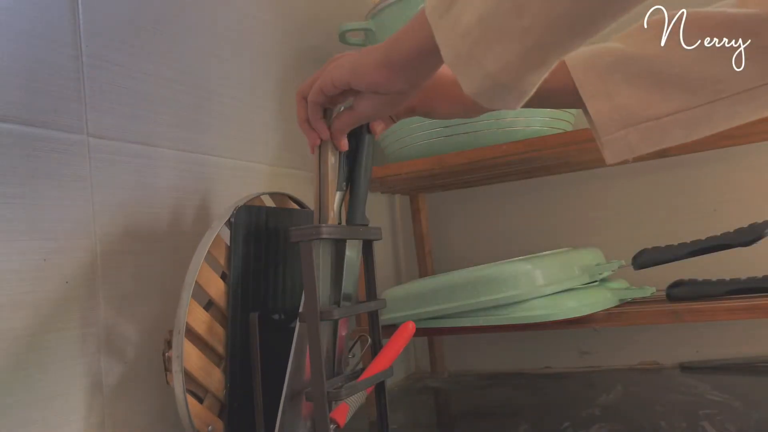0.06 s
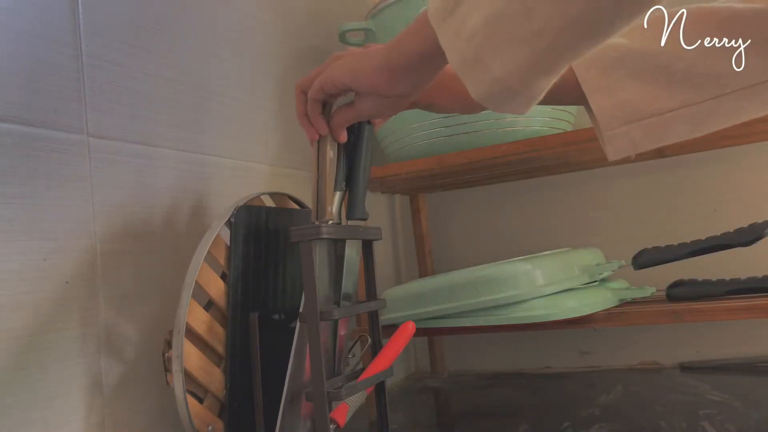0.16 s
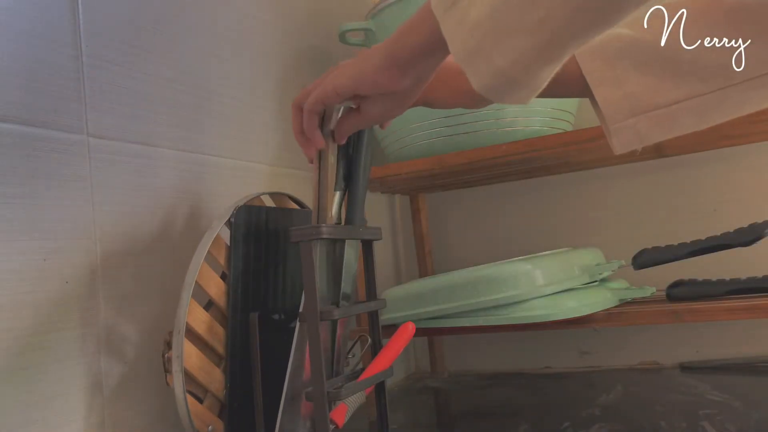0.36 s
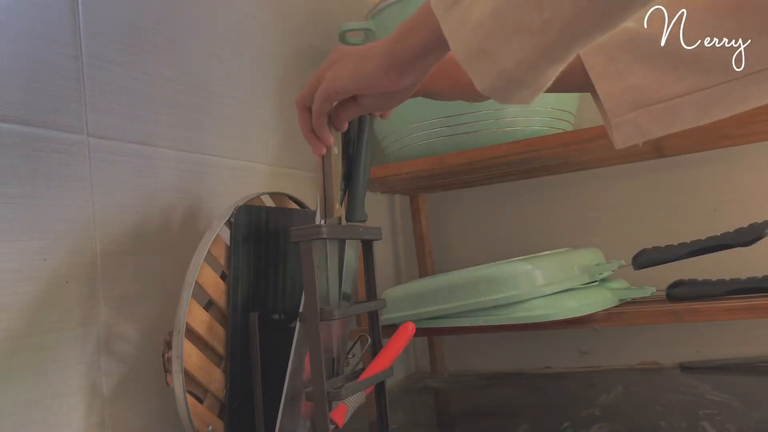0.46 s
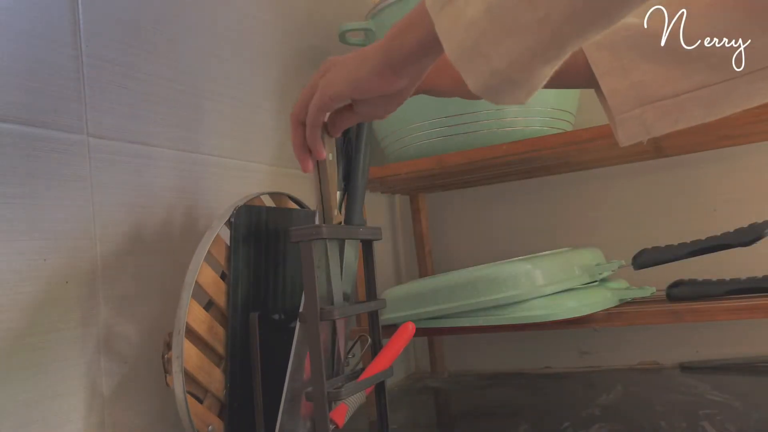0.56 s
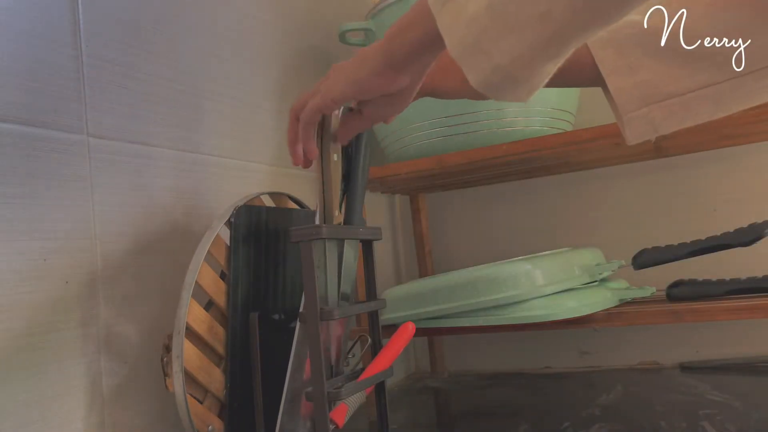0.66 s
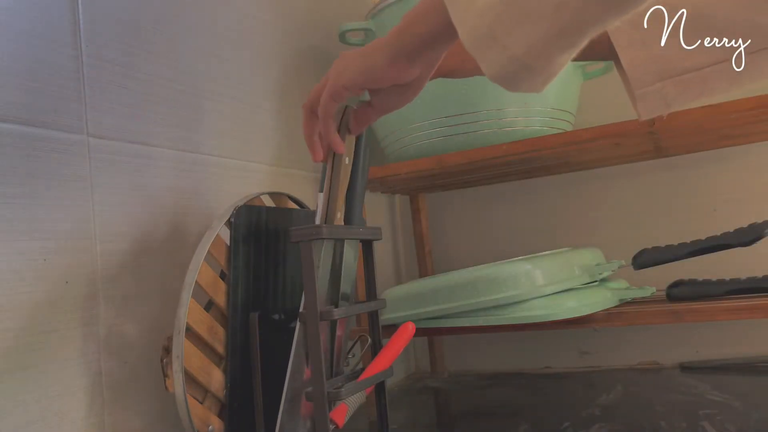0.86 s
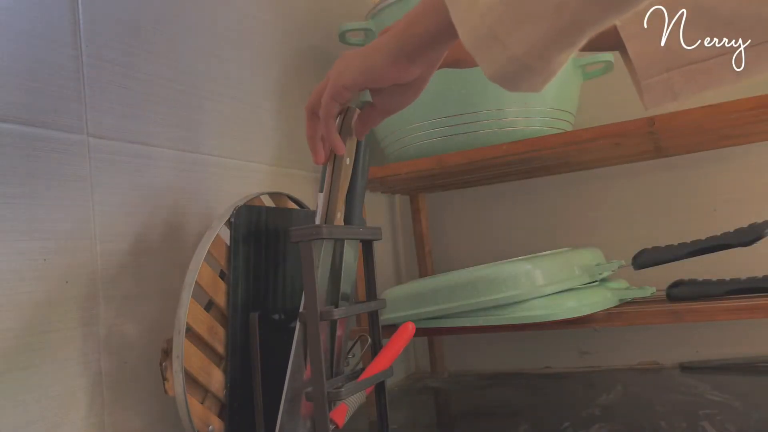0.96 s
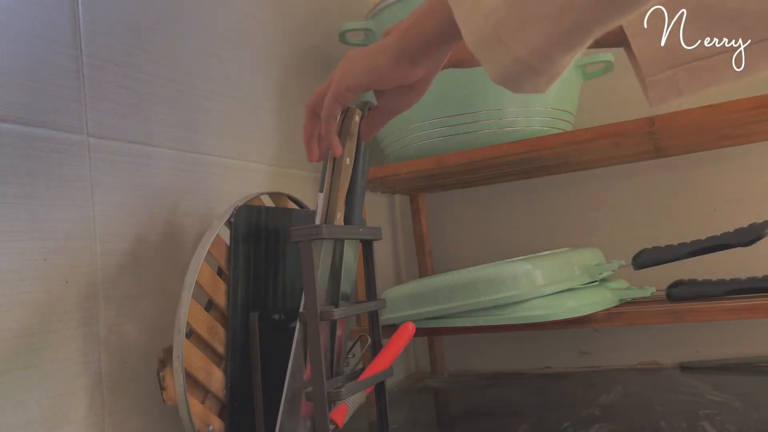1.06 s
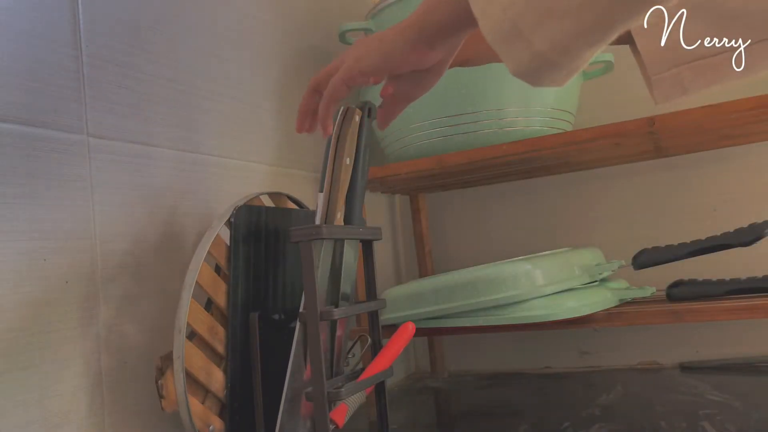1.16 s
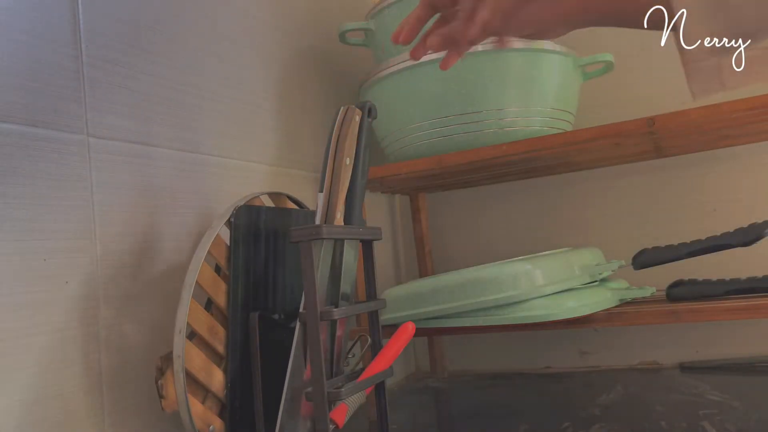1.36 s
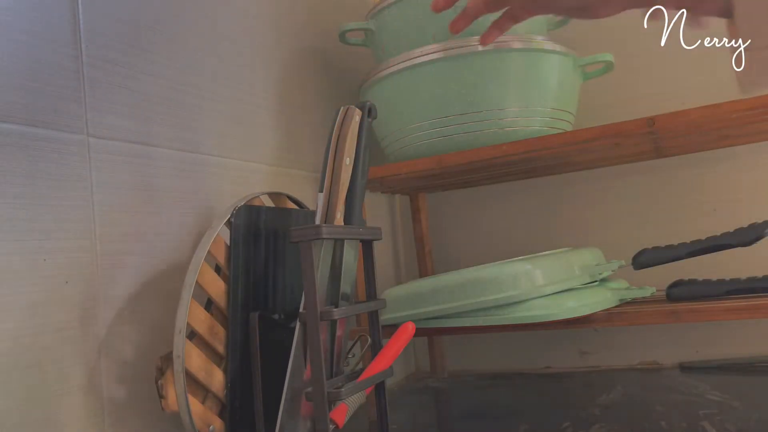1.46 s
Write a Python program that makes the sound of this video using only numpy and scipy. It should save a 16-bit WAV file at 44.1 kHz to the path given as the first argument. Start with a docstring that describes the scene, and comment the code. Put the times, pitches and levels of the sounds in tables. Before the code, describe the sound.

Steel knives clatter into a utensil rack, heard up close. Blades tick and ring thinly as handles land in two clusters of hollow knocks, then a few lighter taps follow in a quiet tiled kitchen.

```python
"""A quiet tiled kitchen, close to a utensil rack as steel knives are lowered into it.
Blades tick and chatter against each other in bursts of noise, then ring with a thin, bright ting.
Handles land on the frame with hollow two-note knocks; the rack rings briefly and the shelf bumps.
The room answers the contacts, over a faint hush and mains hum."""
import sys
import numpy as np
from scipy import signal
from scipy.fft import rfft, irfft
from scipy.io import wavfile
from scipy.ndimage import uniform_filter1d

SR = 44100
rng = np.random.default_rng(int(sys.argv[2]) if len(sys.argv) > 2 else 0)


def to_wav(sig):
    """Store sig (one row per channel, or 1-D mono) as 16-bit WAV at the path in sys.argv[1].

    Samples outside -1..1 are clipped; the rate is SR.
    """
    pcm = np.clip(np.atleast_2d(sig), -1, 1) * 32767
    pcm = np.round(pcm).astype(np.int16)
    wavfile.write(sys.argv[1], SR, pcm.T)  # frames by channels


N = 66150
FFT_SIZE = 2 ** 17
HZ = np.maximum(np.arange(FFT_SIZE // 2 + 1) * SR / FFT_SIZE, 1)
T = np.arange(N) / SR

# Knife hits: t/s, attack/ms, decay/ms, thud/dB, knock/dB, clack/dB, tick/dB, steel/dB, pan/dB, send/dB
HITS = [ (0.005, 2.4, 1.2, -4.5, -0.5, 5.5, -1, -10.5, -3.5, 0),
        (0.030, 0.69, 0.39, -16.5, -6, -10, -5.5, -1, 5.5, -1.5),
        (0.153, 5.8, 4, -16, -17.5, -14, -11, -11, 2.5, 9),
        (0.2236, 1.7, 2.4, -2.5, 15, 8, 7.5, -1.5, 3.5, -1.5),
        (0.2273, 0.28, 0.71, 1, 20.5, 20.5, 8, -1, -3.5, -3.5),
        (0.231, 0.16, 1, -2.5, -0.5, 11.5, -1, 0, 8.5, 2.5),
        (0.2948, 2.5, 5.6, 3, 16, 11.5, 9.5, 13, -1, -7.5),
        (0.299, 0.27, 11, -3.5, 19.5, 12, 3, 12, 2.5, -4.5), (0.424, 1.3, 1.9, -6.5, 0, 4, -3, 5, 1, 4),
        (0.5553, 1.2, 3, -3, 10.5, 9.5, 1, -4, -3, 2.5),
        (0.6053, 1.8, 3.4, 7, 18.5, 18.5, 8, 3, -2.5, -6.5),
        (0.607, 0.2, 0.27, -3.5, 3, 13.5, 6.5, 8, -3.5, -3),
        (0.615, 8.8, 26.6, 10, 17.5, 17, 7, 12.5, 3.5, -11),
        (0.851, 1.5, 0.57, -12.5, -15.5, -3.5, -9, -7, -3.5, 2),
        (1.134, 0.364, 1.9, -8.5, -12.5, -3, -19.5, -21.5, -1.5, 3.5),
        (1.155, 11.1, 30, -3, -1, -7, -5, -12.5, 1, -5.5),
        (1.1666, 0.69, 1.37, -4.5, -1.5, -2.5, -1.5, -7.5, -0.5, -2.5),
        (1.248, 0.76, 0.88, -29, -14.5, -19, -11.5, -15, 0.5, -9.5), ]
# EQ on every hit: f/Hz, gain/dB
HIT_EQ = [(30, -29), (100, -5.5), (170, -5.5), (250, 0), (380, 0), (520, 1.5), (800, 4), (930, 3),
          (1040, 3), (1400, 2), (1850, -0.5), (2500, 0.5), (3250, 1.5), (4200, -8), (5100, -1.5),
          (6100, -8.5), (7200, -21), (8700, -34.5), (10500, -54.5), (13000, -76)]
# Leftward lean of the dry chatter, tings and knocks: f/Hz, pan/dB
LEFT_LEAN = [(200, 3.5), (550, -3.5), (800, -1), (1100, 5.5), (2000, -1), (4800, 7.5), (7000, 2.5)]
# Centres of the thud, knock, clack, tick and steel bands: f/Hz
BAND_CENTRES = (200, 650, 1250, 3000, 5400)


def knife_chatter():
    """Each contact is a noise burst that swells and dies. Gives spectra: dry stereo and a mono send."""
    direct, send = 0, 0
    for start, attack_ms, decay_ms, *bands_db, pan_db, send_db in HITS:
        age_ms = (T - start) * 1000
        falloff = np.where(age_ms < 0, .5 * (age_ms / attack_ms) ** 2, age_ms / decay_ms)
        envelope = np.exp(-np.minimum(falloff, 40))
        burst = flattened(rng.choice([-1, 1], (2, N)) * envelope, bins=1100)
        tone_db = np.interp(np.log(HZ), np.log(BAND_CENTRES), bands_db) + at_hz(HIT_EQ, HZ)
        hit = burst * minimum_phase(tone_db)
        direct = direct + stereo(hit, width=0.4) * panned(pan_db + at_hz(LEFT_LEAN, HZ))
        send = send + hit[0] * from_db(send_db)
    return direct, send


# Handles on the rack: t/s, then f/Hz, t60/s, level/dB for the low note and again for the high note
HANDLE_LANDINGS = [(0.003, 1010, 0.031, -26, 1300, .02, -18.5), (0.2212, 772, 0.032, -7, 969, 0.05, -11.5),
                   (0.2975, 610, 0.018, -11.5, 997, 0.039, -19.5),
                   (0.5548, 558, 0.016, -9.5, 828, 0.013, -1), (0.6027, 548, 0.029, -5, 1060, .04, -12.5),
                   (0.615, 612, .09, -26, 1024, 0.049, -26.5),
                   (1.1655, 745, 0.016, -29.5, 1113, 0.014, -29)]


def handle_knocks():
    """Spectrum of handles landing: two hollow, damped notes each. The open frame radiates little bass."""
    attack_s = 0.0015
    notes = sum(from_db(low_db) * struck_mode(low_hz, low_t60, start, attack_s)
                + from_db(high_db) * struck_mode(high_hz, high_t60, start, attack_s)
                for start, low_hz, low_t60, low_db, high_hz, high_t60, high_db in HANDLE_LANDINGS)
    low_cut = signal.butter(2, 324, "high", fs=SR, output="sos")
    return rfft(signal.sosfilt(low_cut, notes + 1e-18), FFT_SIZE)


# Partials of each blade, by name: f/Hz, level/dB, t60/s
BLADE_MODES = { "first": [(5010, -7, 0.16), (4996, -2, 0.12), (5180, -9, 0.11), (5150, 3, .025)],
               "second": [(5082, -29.5, 0.25), (6045, -15, 0.3), (4980, 6.5, 0.036), (5300, 7, 0.01)],
               "third": [(5087, -6.5, 0.31), (5150, -8, 0.28), (5330, -6, 0.21), (5100, -6, 0.25),
               (5230, 22.5, 0.014)], "fourth": [(3510, 3.5, 0.048), (3200, -2, 0.02)],
               "fifth": [(5050, 1.5, 0.01), (5450, -1, 0.009)], }
# Strikes that set a blade ringing: t/s, blade name, level/dB
BLADE_STRIKES = [(0.029, "fourth", -38.5), (0.151, "first", -40), (0.2945, "first", -35.5),
                 (0.2945, "fourth", -25), (0.422, "second", -34), (0.422, "fifth", -17),
                 (0.605, "first", -32), (0.85, "third", -46), (0.871, "third", -59),
                 (1.166, "fifth", -25.5)]


def blade_tings():
    """Spectrum of steel on steel: a bright chink and a thin ringing tail."""
    tings = sum(from_db(strike_db + mode_db) * struck_mode(hz, t60, start, attack_s=0.00071)
                for start, blade, strike_db in BLADE_STRIKES for hz, mode_db, t60 in BLADE_MODES[blade])
    return rfft(tings, FFT_SIZE)


# Resonances of the rack: f/Hz, energy relative to the send/dB, t60/s
RACK_MODES = [(247, -26, 0.2), (476, -25, 0.8), (551, -21.5, 0.18), (660, -28.5, 0.073), (754, -29, 0.35),
              (1018, -24.5, 0.28), (1066, -31, 0.14), (1262.7, -34, 0.21), (1860, -38, 0.22)]


def rack_ring():
    """Frequency response of the rack: short-lived modes, each with its own path to either ear."""
    ring = 0
    for hz, db, t60 in RACK_MODES:
        mode = struck_mode(hz, t60, start=0.001 * rng.random((2, 1)))
        ring = ring + from_db(db) * mode / np.linalg.norm(mode[0])
    return rfft(ring, FFT_SIZE)


# Low bumps under the rack: t/s, level/dB
SHELF_BUMPS = [(0.002, -48), (0.224, -45), (0.296, -48.5), (0.604, -45), (1.135, -51)]


def shelf_thumps():
    """The weight of a knife reaches the shelf, which gives a soft, low bump."""
    return sum(from_db(db) * struck_mode(hz=102, t60=.3, start=start, attack_s=.006)
               for start, db in SHELF_BUMPS)


# Tiled-room reverb: f/Hz, level/dB, t60/s, pan/dB, width/0-1
REVERB_BANDS = [(100, 10, 0.72, 1, 0.4), (319, 3.5, 0.87, -0.5, .42), (700, -2.5, 0.55, -2, 0.5),
                (1410, -5.5, 0.95, 2, 0.47), (3000, -3, 0.43, 1.5, 0.6), (5150, -0.5, 0.6, 6.5, .5),
                (9597, -3.5, 0.6, 2, .55)]


def kitchen_reverb():
    """Frequency response of the room: diffuse reflections that die at their own rate in each octave."""
    white = rfft(rng.standard_normal((2, N)), FFT_SIZE)
    build_up = 1 - np.exp(-T / 0.00077)
    tail = 0
    for centre_hz in 2. ** np.arange(6, 15):
        octave = irfft(white * np.maximum(1 - abs(np.log2(HZ / centre_hz)), 0))[:, :N]
        t60 = at_hz(REVERB_BANDS, centre_hz, column=2)
        envelope = from_db(-60 * T / t60) * build_up
        tail = tail + octave * envelope / np.linalg.norm(envelope)
    reflections = stereo(flattened(tail, bins=240), width=at_hz(REVERB_BANDS, HZ, column=4))
    return reflections * from_db(at_hz(REVERB_BANDS, HZ)) * panned(at_hz(REVERB_BANDS, HZ, column=3))


# Tone of the hush: f/Hz, relative level/dB
HUSH_EQ = [(25, -7.5), (60, -3), (100, -6), (160, -6), (250, -10.5), (600, -10.5), (1500, -21),
           (4000, -24.5), (6500, -36.5), (10000, -66), (15000, -61.5)]
# Mains hum partials: f/Hz, rms level/dB
HUM_PARTIALS = [(100, -73), (300, -73.5), (500, -73), (700, -75.5)]


def room_tone():
    """A soft, dark hush and the mains hum of an appliance."""
    white = rfft(rng.standard_normal((2, FFT_SIZE)))
    hush = irfft(white * from_db(at_hz(HUSH_EQ, HZ)))[:, :N]
    hum = sum(from_db(db) * np.sqrt(2) * np.sin(2 * np.pi * (hz * T + rng.random()))
              for hz, db in HUM_PARTIALS)
    return from_db(-62) * stereo(hush / hush.std(), width=0.67) + hum


def struck_mode(hz, t60, start, attack_s=1 / SR):
    """One decaying sine, struck at the start time; a longer attack is a softer contact."""
    age = np.maximum(T - start, 0)
    attack = 1 - np.exp(-(age / attack_s) ** 2)
    return np.sin(2 * np.pi * hz * age) * from_db(-60 * age / t60) * attack


def from_db(db):
    """Decibels to gain."""
    return 10 ** (np.asarray(db) / 20)


def at_hz(table, hz, column=1):
    """Read one column of a table on a log-frequency axis."""
    table = np.array(table)
    return np.interp(np.log(hz), np.log(table[:, 0]), table[:, column])


def minimum_phase(db):
    """An EQ with the given gains and no pre-ring."""
    cepstrum = irfft(np.log(from_db(db)))
    cepstrum[1:FFT_SIZE // 2] *= 2
    cepstrum[FFT_SIZE // 2 + 1:] = 0
    return np.exp(rfft(cepstrum))


def flattened(x, bins):
    """Spectrum of x with its broad humps levelled to unit height."""
    spectrum = rfft(x, FFT_SIZE)
    return spectrum / np.sqrt(uniform_filter1d(abs(spectrum) ** 2, bins, axis=-1) + 1e-12)


def stereo(pair, width):
    """Mid and side to left and right, at equal power."""
    mid, side = pair
    return np.array([mid + width * side, mid - width * side]) / np.sqrt(1 + width ** 2)


def panned(db):
    """Left and right gains for a level difference; positive leans left."""
    return from_db(np.array([[.5], [-.5]]) * db)


def scene():
    """Chatter, knocks and tings feed the reverb; the chatter also rings the rack. Shelf and bed below."""
    chatter, send = knife_chatter()
    tings, knocks = blade_tings(), handle_knocks()
    reverb = (send + from_db(-16) * tings + from_db(-9.5) * knocks) * kitchen_reverb()
    ear_delay_s = np.array([[0], [0.00015]])  # the knocks reach the right ear slightly later
    stereo_knocks = knocks * np.exp(-2j * np.pi * HZ * ear_delay_s)
    notes = (stereo_knocks + tings) * panned(at_hz(LEFT_LEAN, HZ))
    knives = irfft(chatter + notes + send * rack_ring() + reverb)[:, :N]
    return knives + shelf_thumps() + room_tone()


def record(dry):
    """A steep high cut, 70 dB down from 15.7 kHz up."""
    return signal.sosfilt(signal.cheby2(12, 70, 15700, fs=SR, output="sos"), dry)


dry = scene()
out = record(dry)
to_wav(out)
```